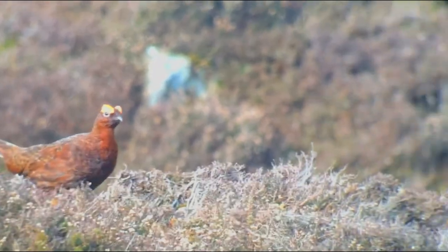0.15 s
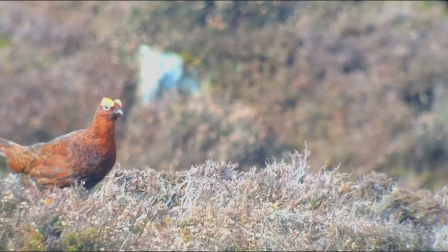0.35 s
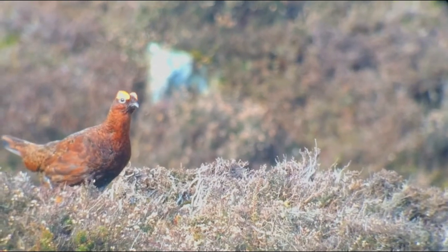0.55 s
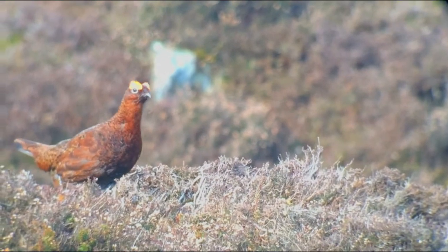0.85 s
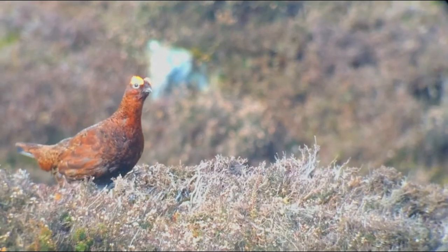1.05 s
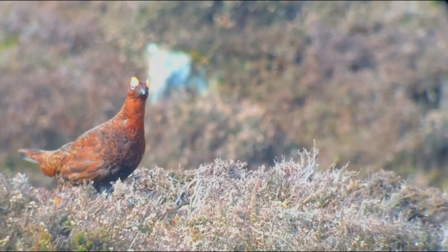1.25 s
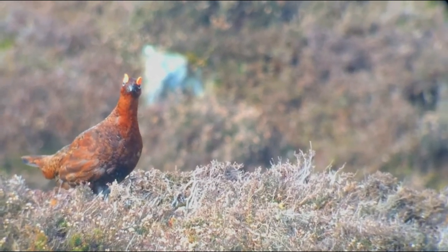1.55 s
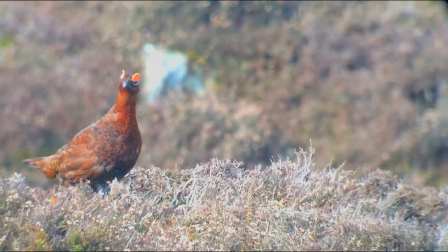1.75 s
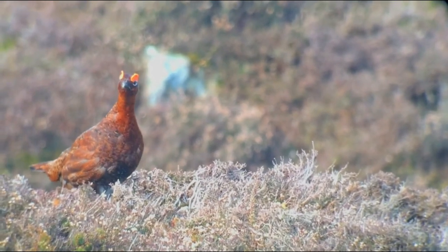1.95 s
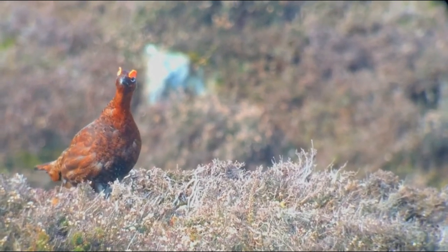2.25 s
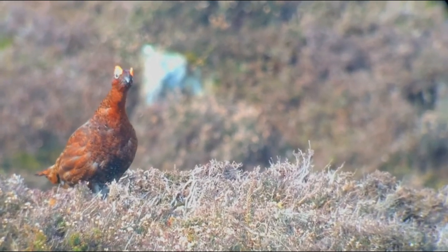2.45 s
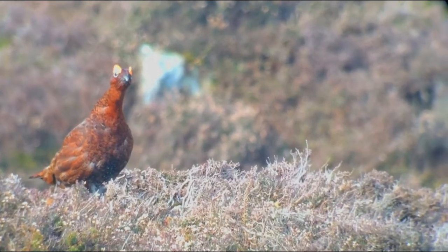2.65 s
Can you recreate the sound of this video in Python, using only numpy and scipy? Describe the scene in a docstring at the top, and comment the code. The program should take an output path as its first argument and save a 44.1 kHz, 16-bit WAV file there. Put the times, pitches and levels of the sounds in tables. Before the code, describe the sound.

A red grouse gives sharp clucks, then a quickening run of soft low notes amid wind rumble.

```python
"""A red grouse on open moorland: sharp clucks and a quickening run of soft low notes, as gliding overtone
series with throat rasp. Distant whistles and a peep are swept sines. Wind on the microphone is shaped noise,
with low thuds from wind and bumps. Camera handling is ringing knocks, brief tonal scrapes and grainy noise
bursts; dry heather crackles as similar bursts. Under it lie the murmur of the moor, a wavering hum, hiss
and a thin electronic whine."""
import sys
import numpy as np
from scipy import signal
from scipy.fft import rfft, irfft
from scipy.io import wavfile
from scipy.ndimage import uniform_filter1d

SR = 44100
rng = np.random.default_rng(int(sys.argv[2]) if len(sys.argv) > 2 else 0)


def master_out(mix):
    """Clip the mix to full scale and print it as 16-bit PCM to the path in sys.argv[1]."""
    frames = np.transpose(np.atleast_2d(mix))
    ceiling = np.clip(frames, -1, 1)
    pcm = np.round(ceiling * 32767).astype(np.int16)
    wavfile.write(sys.argv[1], SR, pcm)


N = 123479

# Grouse calls: (time [s], length [s], level [dB], mid pitch [Hz], overtone boost [dB], pitch fall [share])
CLUCKS = [(0.7052, 0.021, -15.5, 783, -2.5, .03), (1.498, 0.011, -27.5, 817, -4, 0.054),
          (1.7378, 0.0168, -17.5, 785, 10, .03)]
SOFT_NOTES = [(1.684, 0.035, -40.5, 803, -5, -0.076), (1.803, 0.014, -41.5, 783, 7, 0.039),
              (1.943, 0.04, -38.5, 810, -10, 0.021), (2.145, 0.0388, -31, 823, -5, -0.034),
              (2.277, 0.038, -34.5, 821.5, -0.5, -0.0087), (2.390, 0.031, -35.5, 834, 3.5, -0.02),
              (2.488, 0.034, -32, 807, -3, 0.11), (2.576, 0.023, -33.5, 820, -2, -0.03),
              (2.657, 0.023, -35, 813, 0, 0.11), (2.729, 0.029, -36.5, 799, 1, 0.074),
              (2.757, 0.03, -45, 811, -7, 0.0023)]
# Overtones from the second harmonic up, before the boost: (level [dB])
CLUCK_OVERTONES_DB = [-49, -64]
NOTE_OVERTONES_DB = [-38.5, -50, -55, -45.5]
# Throat rasp spectra: (frequency [Hz], relative density [dB])
CLUCK_RASP = [(60, -40), (230, 10.5), (400, 8), (580, 0), (1080, 3.5), (1350, -14.5), (1900, -27),
              (2400, -54.5), (7000, -52.5), (15000, -60)]
NOTE_RASP = [(200, -8), (600, -19), (720, 12.5), (950, -9), (1100, -10), (1250, -20), (1550, -16),
             (1900, -31), (2300, -26), (3000, -41), (5000, -40), (12000, -65)]
CROAK_HZ, CROAK_WANDER = 128.5, 0.219  # mean throb rate, rms share of its wander
OVERTONE_EDGE_HZ = 1160  # the boost acts on rasp above this
# Clicks as two clucks start: (time [s], gain [dB])
SNAPS = [(.7065, -65), (1.739, -70)]
# Ring of a snap: (frequency [Hz], level [dB], t60 [s])
SNAP_MODES = [(4150, -5, .012), (5750, -2, .14), (6235, -5, .14), (7200, 3.5, .015)]
SNAP_CONTACT_S = .0002

# Far whistles: (time [s], length [s], level [dB], lowest pitch [Hz], climb [share], dip place [0-1], fade [dB])
WHISTLES = [(0.330, .15, -66.5, 2885, .145, .27, -15), (0.722, .18, -63.5, 2890, .18, .27, -16),
            (1.160, .16, -69.5, 2905, .11, .24, -12), (1.680, .105, -78, 2830, .085, .58, -2)]
WHISTLE_DROP = .17  # share of the lowest pitch
# Falling peep: (time [s], length [s], level [dB], mid pitch [Hz])
PEEPS = [(1.615, .075, -79, 2510)]
PEEP_FALL = 0.1  # share of the pitch

# Low thuds from wind and bumps on the microphone: (time [s], length [s], level [dB], pitch [Hz])
THUDS = [(0.129, 0.032, -39.5, 65), (0.206, 0.067, -36.5, 58.5), (0.277, 0.04, -39, 50.6),
         (0.4, 0.0367, -35, 87), (0.569, 0.036, -27.5, 103), (1.026, 0.015, -32, 191),
         (1.034, 0.027, -24.5, 79), (1.332, .013, -34, 116), (1.446, 0.0287, -24.5, 92.5),
         (1.466, 0.037, -26, 64.6), (1.602, 0.028, -25.5, 71), (2.097, 0.013, -22.5, 129),
         (2.116, 0.026, -27.5, 92)]
# Crunch in a thud: (frequency [Hz], relative density [dB])
THUD_CRUNCH = [(60, -14), (180, 13.5), (320, 11), (500, -11), (1000, -13), (3000, -66.5)]
THUD_CRUNCH_DB = -19.5
# Knocks on the camera body: (time [s], gain [dB], contact time [s])
KNOCKS = [(1.239, -34, .0021), (1.2557, -21.5, .003), (1.3208, -23.5, .0014), (1.3275, -31, .0007),
          (1.5822, -37, .0005)]
# Camera body modes: (frequency [Hz], level [dB], t60 [s])
BODY_MODES = [(245, -5, .08), (345, -3.5, .06), (615, -3, .07), (1000, -11, .05), (1320, -19, .02),
              (1680, -17, .025)]
# A squeak and the pitched part of a scuff: (time [s], length [s], level [dB], pitch [Hz])
TONAL_SCRAPES = [(1.2825, .010, -35.5, 950), (1.581, .005, -36, 1200)]

# Hand rubs on the camera; soft scuffs; short dry ticks and one faint dull scuff; heather crackles:
# (time [s], length [s], rms level [dB], treble edge [Hz])
RUBS = [(0.50, 0.11, -49, 770), (1.236, 0.17, -46, 1200), (1.319, 0.019, -38, 2200),
        (1.358, 0.013, -49, 1290), (1.581, 0.0203, -45.5, 1600), (1.985, 0.025, -46, 595)]
SCUFFS = [(1.5815, 0.011, -45, 2200), (1.948, 0.014, -50, 1600), (2.008, 0.014, -47, 1180),
          (2.133, 0.063, -50, 910), (2.336, 0.014, -50.5, 1300), (2.352, 0.04, -48, 1300),
          (2.436, 0.011, -50, 1100), (2.466, 0.012, -56, 1200), (2.481, 0.028, -49.5, 1300)]
TICKS_AND_SCUFF = [(0.203, 0.0065, -59.5, 1500), (1.286, 0.0029, -57, 2400), (1.3197, 0.0031, -48, 5000),
                   (1.3275, 0.0034, -56.5, 12000)]
CRACKLES = [(0.159, 0.015, -55, 13000), (0.171, 0.018, -62, 12000), (0.286, 0.0058, -59, 15000),
            (0.291, 0.0077, -64, 15100), (0.310, 0.0025, -67, 13000)]
# Their noise spectra: (frequency [Hz], relative density [dB])
RUB_SPECTRUM = [(50, -28), (150, 0.5), (320, 7.5), (450, -6.5), (620, -13.5), (800, 0), (1100, -12.5),
                (1550, -16), (2100, -40), (5000, -48), (15000, -58)]
SCUFF_SPECTRUM = [(150, 2), (400, -24), (520, 20.5), (640, -5.5), (850, 14), (1120, 5), (1300, -30),
                  (1900, -43), (3000, -37), (12000, -37.5)]
TICK_SPECTRUM = [(500, 0), (1700, -3.5), (3000, -7), (5000, -19), (8000, -14), (12000, -5), (15000, -22)]
CRACKLE_SPECTRUM = [(1000, -7.5), (4000, -24), (6000, -18), (8500, -16), (10000, -6.5), (11900, -3.5),
                    (12600, -14), (15000, -19)]

# Wind gusts: (time [s], level [dB])
WIND_LEVEL = [(0, -47), (0.18, -47.5), (0.245, -44), (0.31, -47.5), (0.423, -39), (0.48, -53), (0.59, -36),
              (0.661, -49.5), (0.80, -53.5), (0.971, -49), (1.04, -38), (1.10, -51), (1.26, -52),
              (1.33, -35.5), (1.39, -47.5), (1.471, -34.5), (1.54, -45.5), (1.62, -33.5), (1.68, -47),
              (1.79, -40), (1.868, -49.5), (1.99, -33.5), (2.06, -42), (2.12, -36.5), (2.25, -36),
              (2.33, -47), (2.55, -51.5), (2.8, -52.5)]
# Wind, moor murmur and hiss spectra: (frequency [Hz], relative density [dB])
WIND_SPECTRUM = [(12, -18), (25, -22), (45, -1.5), (75, 3), (135, -1.5), (190, -9), (300, -16), (450, -23),
                 (800, -34.5), (1500, -62.5), (4000, -86.5)]
MURMUR_SPECTRUM = [(30, -12.5), (120, -9), (220, -7), (430, -13.5), (620, -11.5), (730, 1), (850, -2.5),
                   (980, -13), (1200, -23), (2100, -37.5), (4000, -43)]
HISS_SPECTRUM = [(500, -3.5), (2200, -0.5), (3800, 1), (5400, -4), (6800, 0), (7900, 5.5), (8400, -4),
                 (9600, -4), (11400, 2), (12300, -2.5), (13700, -1), (15300, -1)]
MURMUR_DB, HISS_DB = -55.5, -72  # rms
HUM_HZ, HUM_WIDTH_HZ, HUM_DB = 130.4, 14, -57.5
# Whine of the camera's electronics: (frequency [Hz], rms level [dB])
WHINE = [(3698, -94.5), (15000, -97)]

ECHO_DB, ECHO_T60_S = -12, 0.089
CUT_HZ = 15310


def amp(db):
    """Decibels to gain."""
    return 10 ** (np.asarray(db) / 20)


def unit(x):
    """Scales to rms 1."""
    return x / np.sqrt(np.mean(x ** 2) + 1e-20)


def add(mix, start_s, sound):
    """Mixes a sound in at a time."""
    part = mix[max(round(start_s * SR), 0):][:len(sound)]
    part += sound[:len(part)]


def noise(spectrum):
    """Steady noise of rms 1, coloured by log-frequency interpolation."""
    hz, db = np.transpose(spectrum)
    bins_hz = np.fft.rfftfreq(N, 1 / SR)
    gain = amp(np.interp(np.log(bins_hz + 1), np.log(hz), db))
    return unit(irfft(rfft(rng.standard_normal(N)) * gain, N))


def wander(rate_hz):
    """Random motion of rms 1 with a Gaussian low-pass spectrum."""
    gain = np.exp(-(np.fft.rfftfreq(N, 1 / SR) / rate_hz) ** 2)
    return unit(irfft(rfft(rng.standard_normal(N)) * gain, N))


def progress(length_s):
    """Runs from 0 to 1 over a length."""
    return np.linspace(0, 1, max(round(length_s * SR), 8))


def phase_of(pitch_hz):
    """Phase [rad] of a varying pitch."""
    return 2 * np.pi * np.cumsum(pitch_hz) / SR


def swell(u, rise, hold):
    """Smooth attack to rise, hold until hold, then release; both are shares of the length."""
    ramp = np.interp(u, [0, rise, max(hold, rise), 1], [0, 1, 1, 0])
    return np.sin(np.pi / 2 * ramp) ** 2


def cut(source, start_s, u):
    """The stretch of a running signal that one event uses."""
    return np.take(source, round(start_s * SR) + np.arange(len(u)), mode="wrap")


def strike(modes, contact_s):
    """Decaying modes of a struck object; a longer contact is duller."""
    t = np.arange(SR // 10) / SR
    ring = sum(amp(db - 60 * t / t60_s) * np.sin(2 * np.pi * hz * t) for hz, db, t60_s in modes)
    push = np.sin(np.pi * progress(contact_s)) ** 2
    return np.convolve(ring, push / push.sum())


def background():
    """Murmur and hiss are steady noise; the hum is a sine under random amplitude."""
    hum = unit(wander(HUM_WIDTH_HZ) * np.sin(2 * np.pi * HUM_HZ * np.arange(N) / SR))
    murmur = amp(MURMUR_DB) * noise(MURMUR_SPECTRUM)
    return murmur + amp(HUM_DB) * hum + amp(HISS_DB) * noise(HISS_SPECTRUM)


def whine():
    """Thin steady tones from the camera's electronics."""
    t = np.arange(N) / SR
    return sum(amp(db) * np.sqrt(2) * np.sin(2 * np.pi * hz * t) for hz, db in WHINE)


def wind():
    """Low turbulence, levelled over 3000 samples, then made to follow the gusts."""
    air = noise(WIND_SPECTRUM)
    air = air / np.sqrt(uniform_filter1d(air ** 2, size=3000) + 1e-9)
    return air * amp(np.interp(np.arange(N) / SR, *np.transpose(WIND_LEVEL)))


def thuds():
    """Low thuds from wind and bumps on the microphone: a few low cycles, with some noise."""
    out, crunch = np.zeros(N), noise(THUD_CRUNCH)
    for start_s, length_s, db, hz in THUDS:
        u = progress(length_s)
        rock = np.sin(2 * np.pi * hz * length_s * (u - .5))
        rock = rock + amp(THUD_CRUNCH_DB) * unit(cut(crunch, start_s, u))
        add(out, start_s, amp(db) * swell(u, 0.61, 0.17) * rock)
    return out


def grainy_bursts(rows, spectrum, grain_db, grain_hz):
    """Short bursts of unevenly loud noise that start quickly and die away."""
    out, source = np.zeros(N), noise(spectrum) * amp(grain_db * wander(grain_hz))
    for start_s, length_s, db, edge_hz in rows:
        u = progress(length_s)
        lowpass = signal.butter(2, edge_hz, fs=SR, output="sos")
        dulled = signal.sosfilt(lowpass, source)
        envelope = swell(u, 0.1, 0.89) * amp(-11 * u ** 2)
        add(out, start_s, amp(db) * unit(envelope * cut(dulled, start_s, u)))
    return out


def far_whistles():
    """Thin sines that swell as they dip, then climb, level off and fade."""
    out = np.zeros(N)
    for start_s, length_s, db, hz, climb, dip, fade_db in WHISTLES:
        u = progress(length_s)
        before = np.maximum(1 - u / dip, 0)
        after = np.maximum(u - dip, 0) / (1 - dip)
        pitch_hz = hz * (1 + WHISTLE_DROP * before ** 1.4 + climb * np.sin(np.pi / 2 * after) ** 1.8)
        level = amp(db + fade_db * after) * swell(u, .33, 0.92) ** .8
        add(out, start_s, level * np.sin(phase_of(pitch_hz)))
    return out


def grouse(rows, rise, hold, release, overtones_db, rasp_spectrum, rasp_db, croak, flutter, jitter):
    """A gliding throat tone throbs unevenly with some rasp; the boost sets the brightness of both."""
    out, rasp, shake, drift = np.zeros(N), noise(rasp_spectrum), wander(170), wander(120)
    throb = np.sin(phase_of(CROAK_HZ * (1 + CROAK_WANDER * wander(61.2))))
    highpass = signal.butter(4, OVERTONE_EDGE_HZ, "high", fs=SR, output="sos")
    upper_rasp = signal.sosfiltfilt(highpass, rasp)
    for start_s, length_s, db, hz, boost_db, fall in rows:
        u = progress(length_s)
        phase = phase_of(hz * (1 + fall * (.5 - u) + jitter * cut(drift, start_s, u)))
        tone = np.sin(phase)
        for harmonic, overtone_db in enumerate(overtones_db, 2):
            tone = tone + amp(overtone_db + boost_db) * np.sin(harmonic * phase)
        grit = unit(cut(rasp, start_s, u) + (amp(boost_db) - 1) * cut(upper_rasp, start_s, u))
        voice = tone * (1 + flutter * cut(shake, start_s, u)) + amp(rasp_db) * grit
        envelope = swell(u, rise, hold) ** np.where(u > hold, release, 1)  # release is an exponent
        add(out, start_s, amp(db) * envelope * voice * (1 + croak * cut(throb, start_s, u)))
    return out


def snaps():
    """A tiny bright ringing click as a cluck starts."""
    out = np.zeros(N)
    for start_s, db in SNAPS:
        add(out, start_s, amp(db) * strike(SNAP_MODES, SNAP_CONTACT_S))
    return out


def knocks():
    """The camera body rings dully in its modes when knocked."""
    out = np.zeros(N)
    for start_s, db, contact_s in KNOCKS:
        add(out, start_s, amp(db) * strike(BODY_MODES, contact_s))
    return out


def tonal_scrapes():
    """Brief tonal scrapes, a squeak and the pitched part of a scuff: sines of unsteady pitch."""
    out, drift = np.zeros(N), wander(300)
    for start_s, length_s, db, hz in TONAL_SCRAPES:
        u = progress(length_s)
        pitch_hz = hz * (1 + 0.062 * cut(drift, start_s, u))
        add(out, start_s, amp(db) * np.sin(np.pi * u) ** 2 * np.sin(phase_of(pitch_hz)))
    return out


def peeps():
    """A faint, gently falling sine from a far bird."""
    out = np.zeros(N)
    for start_s, length_s, db, hz in PEEPS:
        u = progress(length_s)
        pitch_hz = hz * (1 + PEEP_FALL * (.5 - u))
        add(out, start_s, amp(db) * np.sin(np.pi * u) * np.sin(phase_of(pitch_hz)))
    return out


def moor(x):
    """Adds a weak, short noise-like scatter from the ground and heather."""
    t = np.arange(SR // 3) / SR
    tail = rng.standard_normal(len(t)) * amp(-60 * t / ECHO_T60_S) * (t > .004)
    return x + amp(ECHO_DB) * signal.fftconvolve(x, tail / np.linalg.norm(tail))[:N]


def scene():
    """Birds and heather scatter off the moor; thuds, handling, wind and background stay dry."""
    clucks = grouse(CLUCKS, rise=0.24, hold=0.19, release=1.46, overtones_db=CLUCK_OVERTONES_DB,
                    rasp_spectrum=CLUCK_RASP, rasp_db=-13, croak=0.045, flutter=0.061, jitter=0.012)
    soft_notes = grouse(SOFT_NOTES, rise=0.46, hold=0.65, release=0.77, overtones_db=NOTE_OVERTONES_DB,
                        rasp_spectrum=NOTE_RASP, rasp_db=-18.5, croak=.2, flutter=.1, jitter=.012)
    heather = grainy_bursts(CRACKLES, CRACKLE_SPECTRUM, grain_db=3, grain_hz=400)
    ticks_and_scuff = grainy_bursts(TICKS_AND_SCUFF, TICK_SPECTRUM, grain_db=1, grain_hz=600)
    rubs = grainy_bursts(RUBS, RUB_SPECTRUM, grain_db=3.5, grain_hz=160)
    scuffs = grainy_bursts(SCUFFS, SCUFF_SPECTRUM, grain_db=0.5, grain_hz=150)
    outdoors = moor(clucks + snaps() + soft_notes + far_whistles() + peeps() + heather)
    handling = knocks() + tonal_scrapes() + ticks_and_scuff + rubs + scuffs
    return (outdoors + thuds() + handling + wind() + background() + whine())[None]


def record(dry):
    """Band limit: a linear-phase low-pass."""
    lowpass = signal.firwin(601, CUT_HZ, window=("kaiser", 8), fs=SR)
    return signal.oaconvolve(dry, lowpass[None], "same")


dry = scene()
out = record(dry)
master_out(out)
```